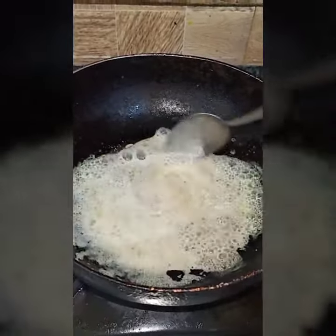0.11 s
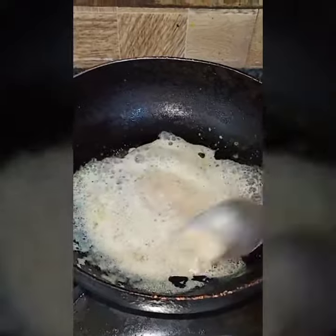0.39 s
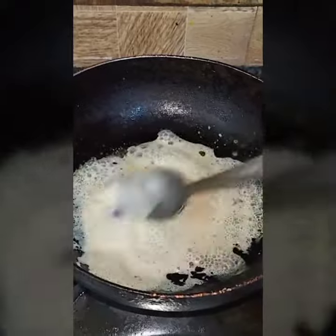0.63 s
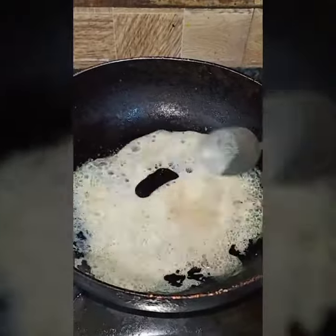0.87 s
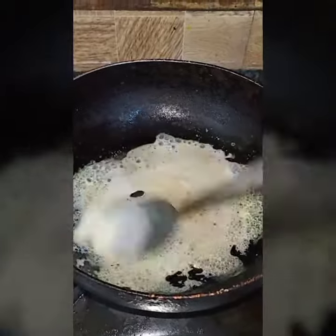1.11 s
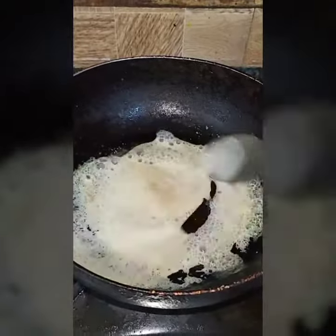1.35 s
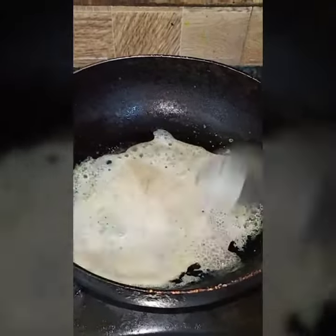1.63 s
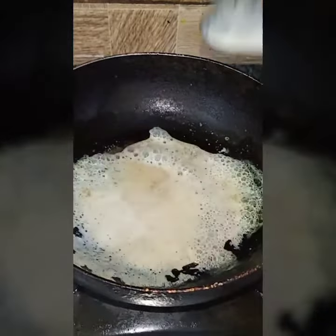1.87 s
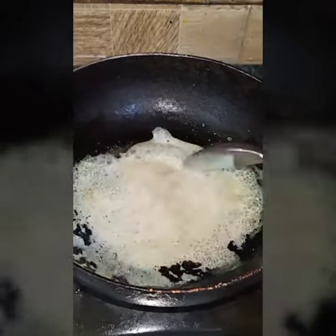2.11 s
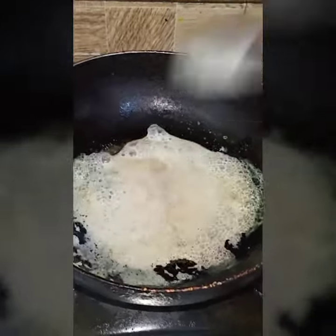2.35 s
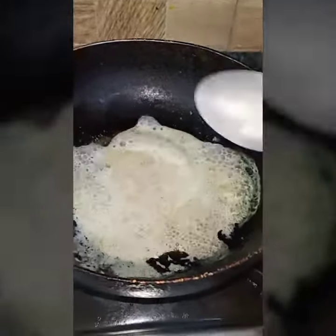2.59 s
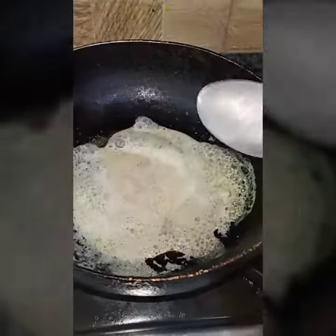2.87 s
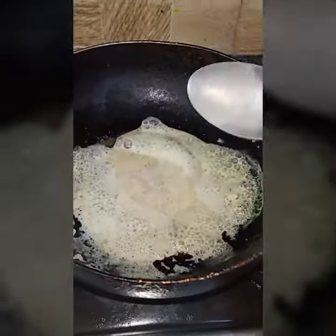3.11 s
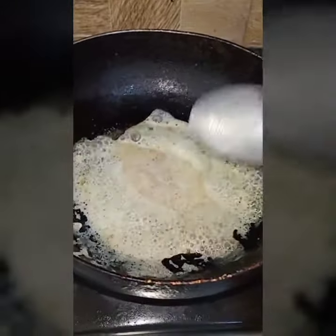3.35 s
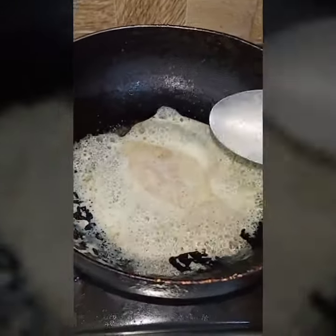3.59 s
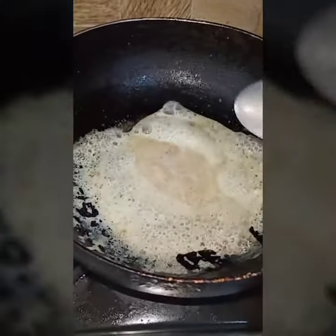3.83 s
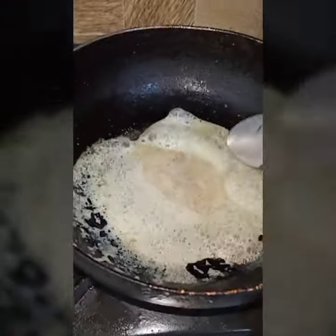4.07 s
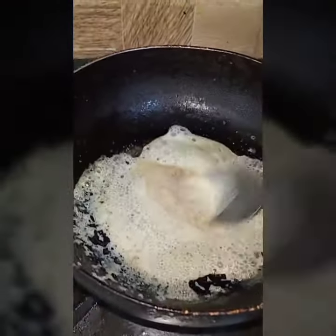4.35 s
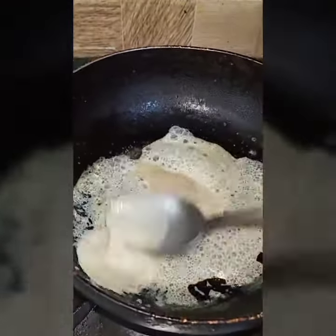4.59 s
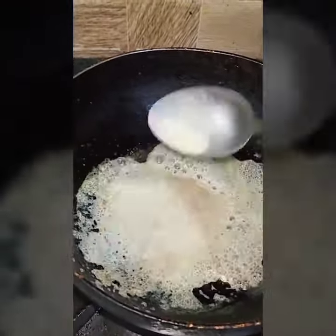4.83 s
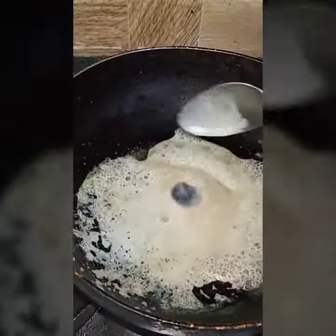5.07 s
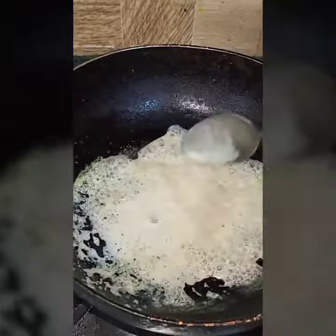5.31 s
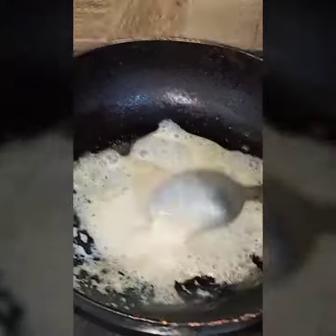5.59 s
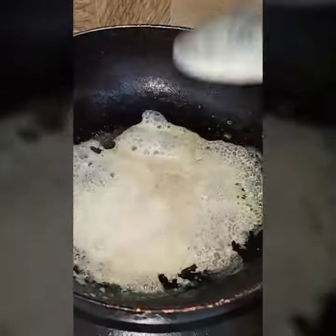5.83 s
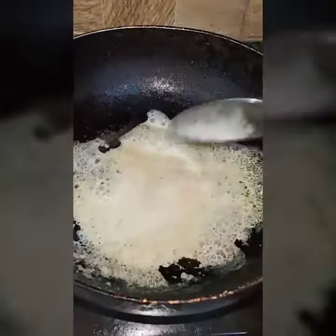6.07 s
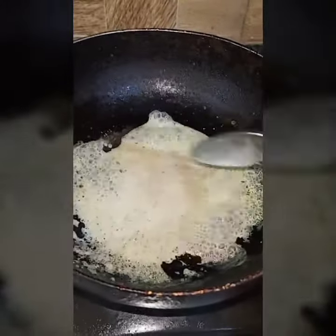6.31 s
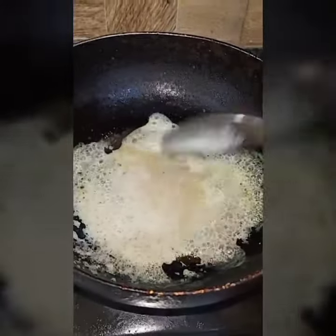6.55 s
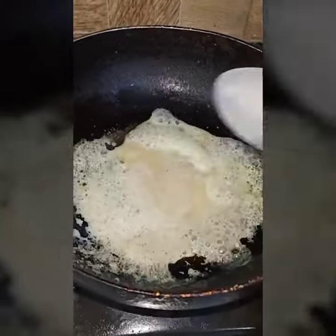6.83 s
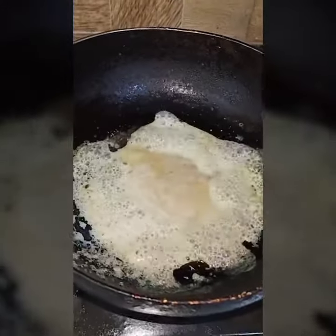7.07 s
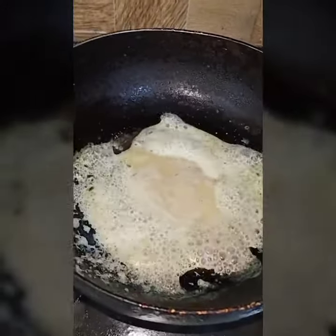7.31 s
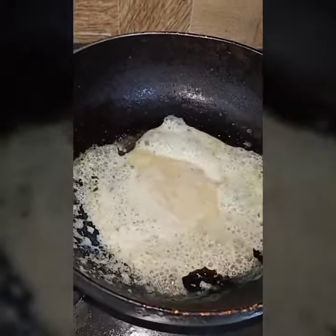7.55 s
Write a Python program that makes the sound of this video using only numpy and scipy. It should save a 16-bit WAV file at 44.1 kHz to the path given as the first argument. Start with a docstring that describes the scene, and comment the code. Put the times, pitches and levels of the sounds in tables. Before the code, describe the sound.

Steady bubbly sizzling in a frying pan, with brisk spoon scraping at first, later two sharp metallic knocks and two soft far-off hoots.

```python
"""A steel spoon scrapes a hot iron pan in which milk froths: uneven slips hiss and ring the iron.
Under it countless small bubbles sizzle as random clicks over steam noise, and the burner rumbles low.
Light taps join the scraping; two hard knocks follow near 4.1 and 5.3 s, and the pan rocks on its stand.
A small kitchen answers as decaying noise, and far outside two soft hoots climb and sag."""
import sys
import numpy as np
from scipy import signal
from scipy.fft import rfft, irfft, next_fast_len
from scipy.io import wavfile
from scipy.ndimage import uniform_filter1d, map_coordinates

SR = 44100
rng = np.random.default_rng(int(sys.argv[2]) if len(sys.argv) > 2 else 0)


def transcribe(signal):
    """Save signal, clipped to [-1, 1], as a 16-bit WAV file at the path in sys.argv[1]."""
    frames = np.atleast_2d(signal).T
    limited = np.clip(frames, -1, 1)
    pcm = np.round(limited * 32767).astype(np.int16)
    wavfile.write(sys.argv[1], SR, pcm)


def ratio_of_db(decibels):
    """Turn decibels (scalar or array-like) into linear amplitude factors; 0 dB maps to 1."""
    return 10 ** (np.asarray(decibels, float) / 20)


N = 338686  # samples in the scene


def unit(x):
    """Scales a signal to rms 1."""
    return x / np.sqrt(np.mean(x ** 2) + 1e-20)


def along(points, hz):
    """Reads a curve of (Hz, value) points on a log frequency axis."""
    f, v = np.transpose(points)
    return np.interp(np.log(hz + 1), np.log(f + 1), v)


def curves(rows):
    """Gives one value per sample for each column after the time."""
    s, *cols = np.transpose(rows)
    return np.array([np.interp(np.arange(N) / SR, s, c) for c in cols])


def wobble(rate):
    """Draws a smooth random curve with rate knots a second."""
    knots = rng.standard_normal(int(N * rate / SR) + 4)
    return map_coordinates(knots, [np.arange(N) * rate / SR])


def swell(start, rise, hold, fall_db_s):
    """Gain that rises, holds at 1 and then fades in dB per second for up to a second."""
    t = np.arange(N) / SR - start
    attack = np.clip(t / max(rise, 0.002), 0, 1) ** 2
    return attack * ratio_of_db(-fall_db_s * np.clip(t - rise - hold, 0, 1))


def filtered(x, response):
    """Applies a complex response of frequency to x."""
    m = 2 * next_fast_len(N // 2 + SR // 4)
    return irfft(rfft(x, m) * response(np.fft.rfftfreq(m, 1 / SR)), m)[..., :N]


def causal(gain):
    """Minimum-phase response with this gain, so that no sound precedes its cause."""
    cep = irfft(np.log(gain + 1e-6))
    half = cep.shape[-1] // 2
    cep[..., 1:half] *= 2
    cep[..., half + 1:] = 0
    return np.exp(rfft(cep))


def patchy(x, depth_db, bins, frames):
    """Makes random patches of time and frequency louder or softer."""
    z = signal.stft(x, nperseg=1024)[2]
    field = uniform_filter1d(rng.standard_normal(z.shape), bins, 1)
    field = uniform_filter1d(field, frames, 2)
    return signal.istft(z * ratio_of_db(depth_db * unit(field)), nperseg=1024)[1][:, :N]


def narrow(hz, width_hz):
    """A rough narrow band that follows a pitch curve, drawn afresh for each port."""
    phase = 2 * np.pi * np.cumsum(hz * np.ones(N)) / SR
    return np.array([wobble(width_hz) * np.sin(phase) + wobble(width_hz) * np.cos(phase) for _ in "LR"])


def clicks(rate, spread_db):
    """Two streams of random clicks of uneven size, rate a second in each."""
    hit = rng.random((2, N)) < rate / SR
    return hit * rng.standard_normal((2, N)) * ratio_of_db(spread_db * rng.standard_normal((2, N)))


# likeness of the two microphone ports: pitch_hz, correlation (1 alike, 0 unrelated, negative opposed)
ALIKE = [(60, 0.15), (180, 0.97), (550, 0.33), (1650, -0.18), (4970, -0.024), (15000, -0.048)]


def ports(pair):
    """Mixes two unrelated signals as mid and side, so that the ports agree more or less by frequency."""
    def turn(hz):
        return np.arccos(np.clip(along(ALIKE, hz), -1, 1)) / 2

    mid, side = filtered(pair, lambda hz: np.array([np.cos(turn(hz)), np.sin(turn(hz))]))
    return np.array([mid + side, mid - side])


def leaning(x, balance):
    """Makes one port louder than the other, by frequency."""
    return filtered(x, lambda hz: causal(ratio_of_db(np.outer([0.5, -0.5], along(balance, hz)))))


# ringing modes of the pan: pitch_hz, width_hz, level_db (relative)
PAN = [(175, 20, -12), (275, 9.6, -15), (340, 44, -7.5), (405, 25.3, 7), (547, 43, -5), (813, 14, -11),
       (1253, 23, 7), (1338, 28.3, 7.5), (1700, 16, -6), (1953, 10, 9), (2355, 9.7, -14), (2406, 60, 9),
       (2574, 22, 0.5), (2787, 42, 5.5), (2880, 49, -2), (3250, 30, 5), (3690, 93, -5), (5785, 150, -2),
       (6100, 36, -12), (7030, 31, 3), (7450, 75, -1), (8300, 58.8, -5)]


def iron(f, broad, broad_db):
    """The pan's answer: resonant modes of alternating sign over the dull answer of the whole bowl."""
    ring = 0
    for k, (c, w, db) in enumerate(PAN):
        ring = ring + (-1) ** k * ratio_of_db(db) * 1j * f * w / (c * c - f * f + 1j * f * w)
    return ring + ratio_of_db(broad_db) * causal(ratio_of_db(along(broad, f)))


# broad colour of metal sliding on metal: pitch_hz, level_db (relative, per Hz)
CONTACT = [(59, -56), (100, -35), (218, -25), (275, -4.5), (394, 5), (457, -28), (808, -5.5), (998, -11),
           (1340, -4), (2370, -0.5), (4750, -10.5), (7410, -8.5), (15500, -16)]


def band(lo_hz, hi_hz):
    """A soft-edged band of the pan's answer to sliding."""
    def edges(f):
        return np.sqrt((1 + (lo_hz / (f + 1)) ** 12) * (1 + (f / hi_hz) ** 12))

    return lambda f: iron(f, CONTACT, broad_db=-1.0) / edges(f)


# spoon strokes: start_s, rise_s, hold_s, then peaks before waver and room:
# friction hiss_db, ring of the bowl_db, ring of the rim_db
SCRAPES = [(0.0, 0.0021, 0.16, -39, -40.5, -53.5), (0.197, 0.017, 1.26, -45, -66.5, -67.5),
           (0.334, 0.023, 0.0053, -44, -47, -48.5), (0.561, 0.0083, 0.049, -29, -41.5, -50.5),
           (0.813, 0.047, .04, -37, -45.5, -70), (0.899, 0.018, 0.018, -29.5, -49.5, -58),
           (1.056, 0.021, .01, -34.5, -51, -44.5), (1.123, 0.044, 0.055, -36.5, -43.5, -55.5),
           (1.273, 0.047, 0.024, -31, -38, -48), (4.069, 0.0037, 0.0056, -31.5, -41, -36),
           (4.11, 0.011, 0.16, -37, -48, -56), (5.292, 0.0074, 0.063, -39.5, -41, -57)]
# fading once the spoon eases off
HISS_FALL_DB_S, BOWL_FALL_DB_S, RIM_FALL_DB_S, RING_WAVER_DB = 183, 97, 221, 0.5
# presses that rock the pan on its stand: start_s, hold_s, level_db (drive of the rocking), pitch_hz
PRESSES = [(0.0, 0.17, -48.5, 310), (0.253, 0.11, -70, 340), (0.372, 0.071, -44, 378),
           (0.472, 0.21, -51, 387), (.84, 0.22, -48, 380), (1.093, 0.16, -68, 350),
           (1.256, 0.049, -49, 275), (1.34, 0.056, -45, 405), (4.067, .01, -39.5, 297),
           (4.096, 0.25, -52.5, 343), (5.303, 0.049, -47.5, 318)]
PRESS_RISE_S, PRESS_FALL_DB_S = 0.017, 229


def strokes():
    """The spoon's edge slips in tiny uneven jerks; hard sliding hisses, pressing rings and rocks the bowl."""
    hiss = sum(ratio_of_db(db) * swell(s, rise, hold, HISS_FALL_DB_S) for s, rise, hold, db, _, _ in SCRAPES)
    bowl = sum(ratio_of_db(db) * swell(s, rise, hold, BOWL_FALL_DB_S) for s, rise, hold, _, db, _ in SCRAPES)
    rim = sum(ratio_of_db(db) * swell(s, rise, hold, RIM_FALL_DB_S) for s, rise, hold, _, _, db in SCRAPES)
    presses = [ratio_of_db(db) * swell(s, PRESS_RISE_S, hold, PRESS_FALL_DB_S) for s, hold, db, _ in PRESSES]
    chatter = ratio_of_db(0.98 * wobble(35) + 1.05 * wobble(120))
    jerks = chatter * (clicks(3000, spread_db=3) + 0.25 * rng.standard_normal((2, N)))

    def rough(lo_hz, hi_hz, depth_db):
        return unit(patchy(filtered(jerks, band(lo_hz, hi_hz)), depth_db, bins=5, frames=3))

    def waver():
        return ratio_of_db(RING_WAVER_DB * wobble(16))

    rocking = 0.34 * sum(presses) * rough(130, 800, depth_db=2.5)
    # the pitch of each press decides which low mode answers
    for c, w, _ in PAN[1:4]:
        # twice the mode's width, passed twice
        mode = filtered(jerks, lambda f: (1j * f * 2 * w / (c * c - f * f + 1j * f * 2 * w)) ** 2)
        near = sum(np.exp(-((row[3] / c - 1) / 0.15) ** 2) * gain for row, gain in zip(PRESSES, presses))
        rocking = rocking + near * unit(mode)
    sliding = hiss * rough(1835, 24000, depth_db=2.5)
    bowl_ring = bowl * waver() * rough(1150, 1750, depth_db=4)
    rim_ring = rim * waver() * rough(640, 870, depth_db=4)
    return sliding + bowl_ring + rim_ring + waver() * rocking


# dying of the kitchen's answer: pitch_hz, t60_s
KITCHEN = [(200, 0.23), (1300, 0.48), (4000, 0.35), (12000, 0.59)]


def kitchen(x):
    """The room's answer is half a second of noise in which each frequency dies at its own speed."""
    hz, t, z = signal.stft(rng.standard_normal((2, SR // 2)), SR, nperseg=256)
    decay = ratio_of_db(-60 * t / along(KITCHEN, hz)[:, None])
    tail = signal.istft(z * decay, SR, nperseg=256)[1]
    late = np.pad(x, ((0, 0), (200, 0)))  # the answer starts 200 samples late
    return signal.fftconvolve(late, tail / np.linalg.norm(tail[0]), axes=1)[:, :N]


# thuds passed down to the stove: start_s, hold_s, level_db (before the ports)
THUDS = [(0.0, 0.16, -57), (0.724, .01, -67), (1.15, .01, -77), (4.06, 0.16, -47.5), (5.3, 0.12, -57.5)]
THUD_RISE_S, THUD_FALL_DB_S = 0.025, 300  # shared with the bumps


def thuds():
    """Pressure on the pan shakes the stove under it: noise through one broad 175 Hz resonance."""
    gain = sum(ratio_of_db(db) * swell(s, THUD_RISE_S, hold, THUD_FALL_DB_S) for s, hold, db in THUDS)

    def body(f):
        resonance = 1j * f * 120 / (175 ** 2 - f * f + 1j * f * 120)
        return resonance / (1 + (f / 240) ** 8) / (1 + (70 / (f + 1)) ** 2)

    shaking = filtered(rng.standard_normal((2, N)), body)
    return gain * unit(patchy(shaking, depth_db=7, bins=2, frames=3))


# low bumps, as of the stove jolted or the flame flaring: start_s, hold_s, level_db (before the ports)
BUMPS = [(0.0, .02, -78), (.09, .06, -78), (0.503, 0.062, -70), (.71, 0.034, -72), (1.125, 0.054, -65),
         (1.33, .05, -82), (1.94, .04, -73), (4.07, 0.14, -70), (4.397, 0.056, -71), (5.328, 0.13, -71),
         (5.97, 0.032, -75.5), (6.177, 0.073, -75), (6.66, 0.08, -74), (6.907, 0.068, -70.5)]


def bumps():
    """Short swells of the deepest rumble: noise gathered round 100 Hz over a weak floor of bass."""
    gain = sum(ratio_of_db(db) * swell(s, THUD_RISE_S, hold, THUD_FALL_DB_S) for s, hold, db in BUMPS)

    def deep(f):
        return ratio_of_db(-18) / (1 + (f / 75) ** 4) + 1 / (1 + ((f - 100) / 16) ** 2)

    return gain * unit(filtered(rng.standard_normal((2, N)), lambda f: deep(f) * f / (f + 30)))


# course of the froth: time_s, level_db (before a fixed 3 dB lift), murmur_db (gain of its lower part)
FROTH = [(0.0, -46, 16), (1.3, -52, -11), (1.56, -49.5, -6.5), (2.07, -50.5, 1.5), (4.04, -49, 4),
         (4.53, -48, 1.5), (5.37, -49.5, -3), (5.56, -50, -2.5), (7.25, -50.5, 4.5), (7.68, -50, 4.5)]
# colour of the sizzle: pitch_hz, level_db (relative, per Hz)
FIZZ = [(650, -52), (1100, -37), (1530, -20), (1770, -26.5), (2140, -19), (2410, -8), (2980, -8.5),
        (3360, 1.5), (3640, -1.5), (4250, -2.5), (5180, -10), (7550, -3.5), (8910, -10.5), (13700, -15),
        (15500, -14.5)]


def froth():
    """Thousands of bubbles a second burst in the foam, over the hiss of steam; larger bubbles murmur below."""
    db, murmur_db = curves(FROTH)
    bursts = unit(clicks(4000, spread_db=4)) + 1.62 * rng.standard_normal((2, N))
    seethe = 0.21 * wobble(2.85) + 0.2 * wobble(18) + 0.4 * wobble(60)
    coloured = filtered(bursts, lambda f: causal(ratio_of_db(along(FIZZ, f))))
    fizz = unit(patchy(coloured, depth_db=1.5, bins=4, frames=5))
    murmur = filtered(fizz, lambda f: 1 / (1 + (f / 2600) ** 12))
    return ratio_of_db(db + 3 + seethe) * (fizz + (ratio_of_db(murmur_db) - 1) * murmur)


# colour of the kitchen's low noise: pitch_hz, level_db (relative, per Hz)
DRONE = [(18, -55.5), (30, -46.5), (96, -2), (237, -14), (340, -4), (555, -8), (737, -21), (890, -16),
         (1080, -17.5), (1300, -47), (1690, -47), (2860, -120)]
BURNER_DB, BURNER_DRIFT_DB = -86.5, 3
# loudest swells of a soft low note: start_s, hold_s, level_db (added to the steady note, before its waver)
HUM = [(2.11, 0.046, -73), (2.907, 0.043, -65.5), (3.14, 0.047, -73), (3.894, 0.069, -68),
       (4.603, 0.025, -69.5), (4.912, 0.12, -70), (5.547, 0.25, -66.5), (6.33, 0.037, -76),
       (7.306, 0.1, -71)]
HUM_DB, HUM_RISE_S, HUM_FALL_DB_S = -85, 0.023, 132  # level between swells
# soft short notes among the bubbles: centre_s, pitch_hz, level_db (before the ports), length_s
NOTES = [(1.856, 1243, -64.5, 0.21), (3.3, 1920, -65, 0.076), (5.06, 930, -63, 0.051)]


def background():
    """Low kitchen noise in patches, the burner's rumble, a soft wavering note and a few short ones."""
    noise = filtered(rng.standard_normal((2, N)), lambda f: ratio_of_db(along(DRONE, f)))
    low = ratio_of_db(-73.5) * unit(patchy(noise, depth_db=6, bins=4, frames=7))
    burner_db = BURNER_DB + BURNER_DRIFT_DB * wobble(2.8) + 3.3 * wobble(5.7)
    burner = ratio_of_db(burner_db) * narrow(101, width_hz=17)
    hum = ratio_of_db(HUM_DB) + sum(ratio_of_db(db) * swell(s, HUM_RISE_S, hold, HUM_FALL_DB_S) for s, hold, db in HUM)
    note = hum * ratio_of_db(3.5 * wobble(10)) * narrow(336 + 4 * wobble(4.4), width_hz=34)
    t = np.arange(N) / SR
    swells = sum(ratio_of_db(db) * np.exp(-((t - s) / (span / 2)) ** 2) for s, _, db, span in NOTES)
    centres, pitches = np.transpose(NOTES)[:2]
    nearest = abs(t - centres[:, None]).argmin(axis=0)  # one band jumps to the pitch of the nearest note
    short = swells * narrow(pitches[nearest], width_hz=140)
    return low + burner + note + short


# spoon blows: start_s, push_db and rattle_db (force on the pan), rattle t60_s, balance_db (left over right)
BLOWS = [(.365, -38, -38, .03, 8), (0.569, -38, -51, 0.022, 10), (.91, -33, -43, 0.017, 4.5),
         (0.9532, -18.5, -36.5, 0.0063, 3), (1.0875, -44, -47, 0.0193, -0.5),
         (1.314, -20, -27.5, 0.0109, -7), (4.0704, -17, -28.5, .01, 3), (4.0747, -6, -16, 0.0081, -1),
         (4.076, -2, -10, 0.017, -7), (4.078, -3, -20, 0.092, 1.5), (4.206, -30, -34, 0.085, -1),
         (4.224, -12, -37, 0.034, -1), (5.2987, -0.5, -23, 0.031, -1.5), (5.3564, -30, -39, .01, 6.5),
         (5.3682, -23, -36.5, 0.012, -13.5)]
# broad colour of a blow: pitch_hz, level_db (relative, per Hz)
CRACK = [(300, -13.5), (750, -11.5), (1000, -10.5), (1300, -2), (1750, -8.5), (2400, 2), (3100, 0.5),
         (3900, -3), (4960, -21.5), (6800, -2), (8700, -15), (10100, -14), (15500, -25.5)]


def blows():
    """Each blow is a sharp push and a short rattle of contact, too quick to stir the lowest modes."""
    force, t = np.zeros((2, N + SR)), np.arange(SR // 8) / SR
    for s, push_db, rattle_db, t60, balance_db in BLOWS:
        contact = rng.standard_normal((2, len(t))) * ratio_of_db(rattle_db - 60 * t / max(t60, 0.002))
        contact[[0, 1], [16, 0]] += ratio_of_db(push_db)  # the push reaches the left port 16 samples later
        sides = ratio_of_db(np.array([[balance_db], [-balance_db]]) / 2)
        force[:, round(s * SR):][:, :len(t)] += sides * contact

    def answer(f):
        return iron(f, CRACK, broad_db=5.5) * ratio_of_db(9) * (1j * f / (600 + 1j * f)) ** 2

    return filtered(force[:, :N], answer)


# far hoots: start_s, climb_s, length_s, top pitch_hz, level_db (at the top, before waver and echo)
HOOTS = [(4.978, .29, .8, 687, -59.5), (5.973, .15, .68, 767.6, -57)]
HOOT_REST_HZ, HOOT_RISE_S, HOOT_FALL_DB_S, HOOT_SAG_DB = 582, 0.084, 300, 10.5


def hoots():
    """A far tone climbs and sags, weaker away from its top, blurred by echoes into a rough trailing band."""
    t = np.arange(N) / SR
    arcs = [np.sin(np.pi / 2 * np.interp(t - s, [0, climb, span], [0, 1, 0]))
            for s, climb, span, _, _ in HOOTS]
    hz = HOOT_REST_HZ + sum((row[3] - HOOT_REST_HZ) * arc for row, arc in zip(HOOTS, arcs))
    gain = 0
    for (s, _, span, _, db), arc in zip(HOOTS, arcs):
        envelope = swell(s, HOOT_RISE_S, span - HOOT_RISE_S, HOOT_FALL_DB_S)
        gain = gain + ratio_of_db(db - HOOT_SAG_DB * (1 - arc)) * envelope
    tone = narrow(hz, width_hz=170) + 0.18 * narrow(hz, width_hz=380)
    hoot = gain * ratio_of_db(1.6 * wobble(18)) * tone
    return 0.79 * hoot + 0.37 * kitchen(hoot)


# side of the spoon: pitch_hz, balance_db (left over right)
LEAN = [(60, 8), (150, -3), (380, 2), (950, -1), (2380, 1), (5980, -1), (15000, 4.5)]
# side of froth and background: pitch_hz, balance_db (left over right)
LEAN_STEADY = [(60, -4), (92, -1), (140, 4), (210, -7.5), (330, 10), (500, 1.5), (770, 3), (1170, -6),
               (1790, -7), (2740, 4), (4190, -2), (6410, -3.0), (9810, -3), (15000, 4.5)]


def scene():
    """Spoon and pan in the room, over froth, background and hoots."""
    scrape, knocks = strokes(), blows()
    room = kitchen(ratio_of_db(-9) * knocks + ratio_of_db(-12.5) * scrape)
    spoon = knocks + ports(scrape + thuds() + bumps() + room)
    steady = ports(froth() + background() + hoots())
    return leaning(spoon, LEAN) + leaning(steady, LEAN_STEADY)


def low_pass(x):
    """Removes everything above the highest recorded frequency."""
    return signal.sosfilt(signal.butter(12, 16830, fs=SR, output="sos"), x)


def record(dry):
    """Soft clipping rounds off the hardest blows, then a steep lowpass ends the treble at 15600 Hz."""
    clipped = dry / (1 + abs(dry / 0.85) ** 4) ** (1 / 4)
    finished = filtered(clipped, lambda hz: hz < 15600)
    return low_pass(finished)


dry = scene()
out = record(dry)
transcribe(out)
```